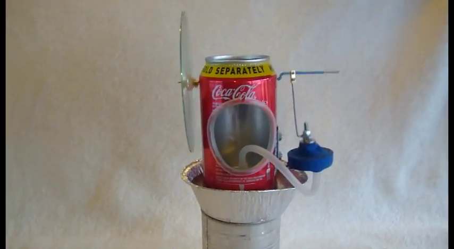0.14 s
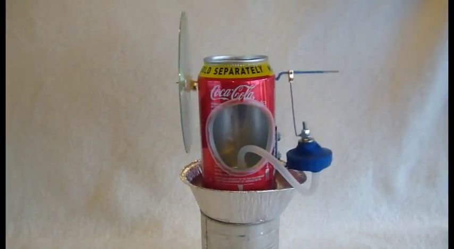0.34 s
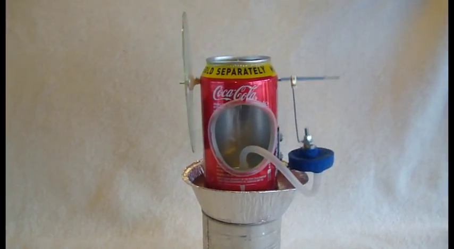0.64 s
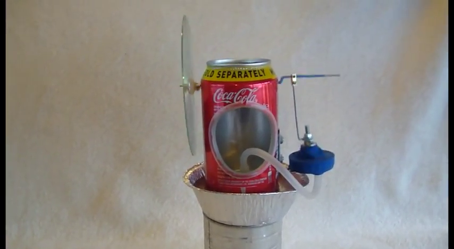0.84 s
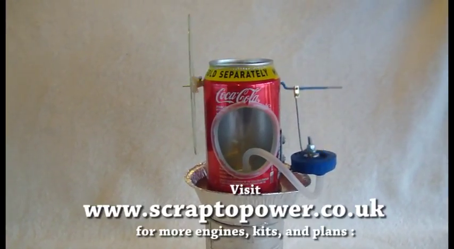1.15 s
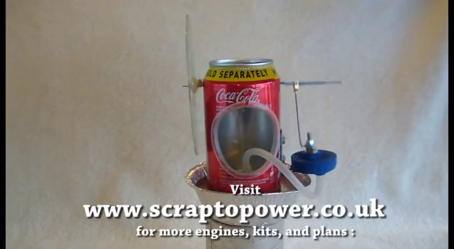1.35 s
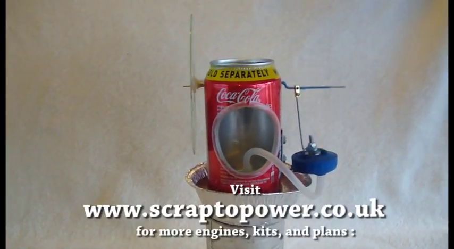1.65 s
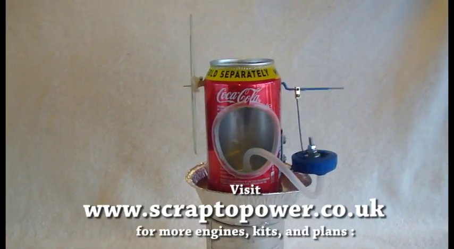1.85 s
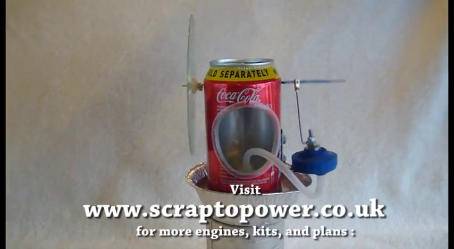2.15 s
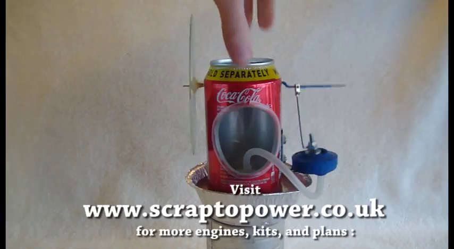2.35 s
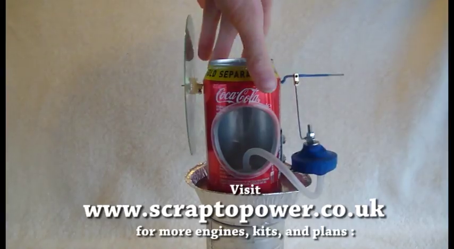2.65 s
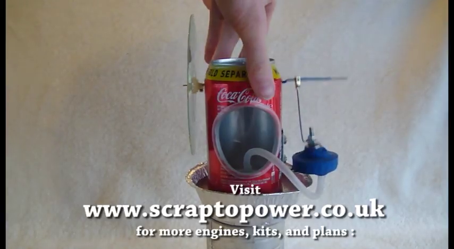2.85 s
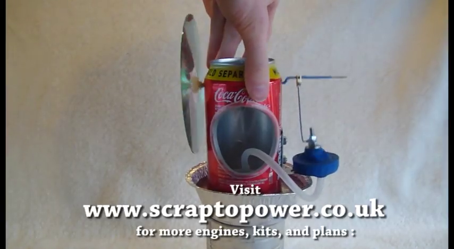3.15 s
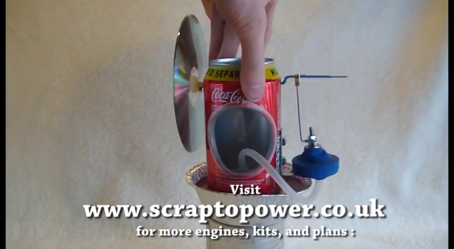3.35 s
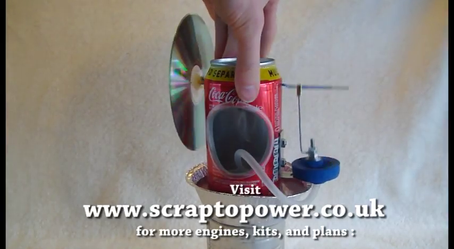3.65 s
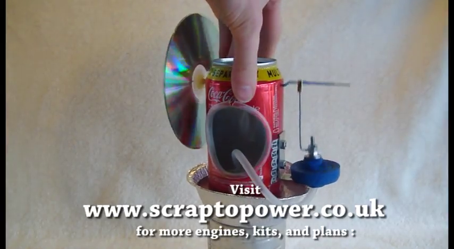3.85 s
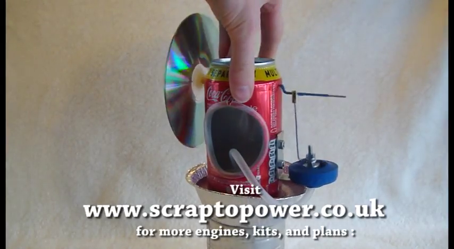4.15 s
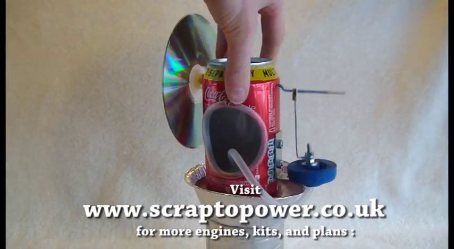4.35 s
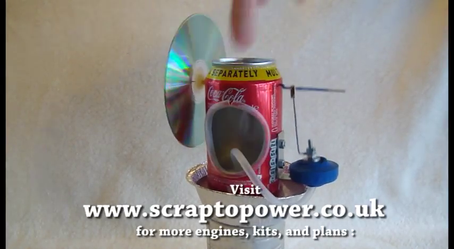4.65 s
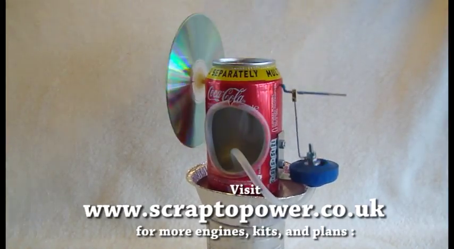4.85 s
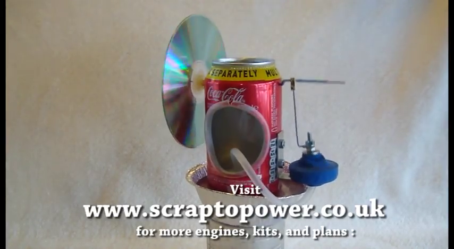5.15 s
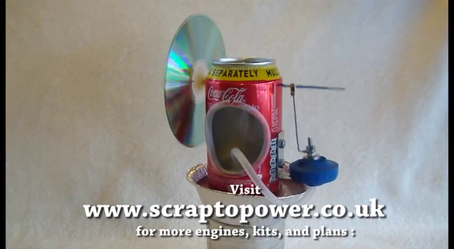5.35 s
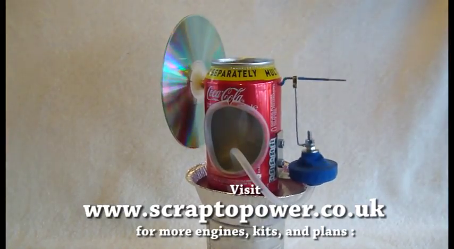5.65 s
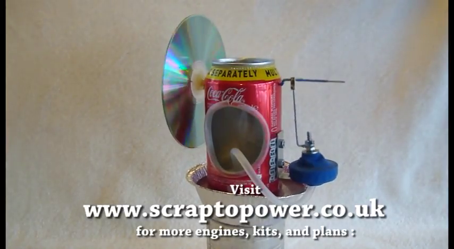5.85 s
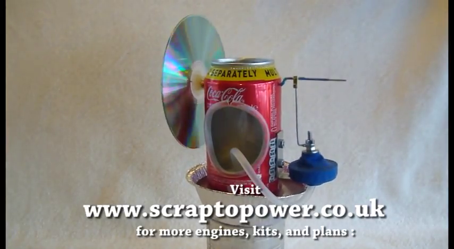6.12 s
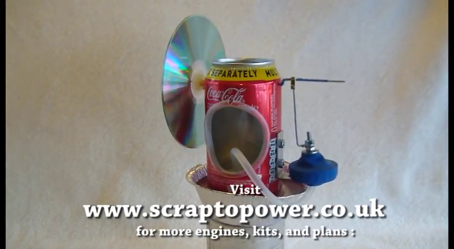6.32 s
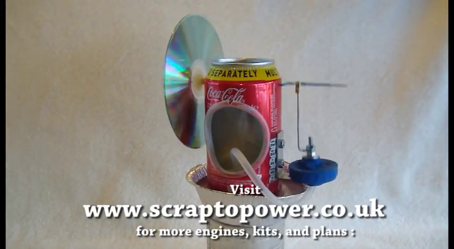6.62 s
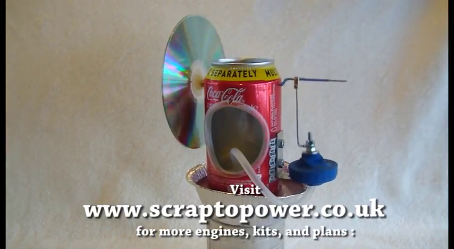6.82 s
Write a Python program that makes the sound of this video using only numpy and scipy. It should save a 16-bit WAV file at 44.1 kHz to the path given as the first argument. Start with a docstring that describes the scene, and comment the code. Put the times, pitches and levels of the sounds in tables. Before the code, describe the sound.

A small home-made engine built from a tin can clatters evenly throughout, about four turns a second. Each turn brings a sharp clack, light wire ticks, a knock from the loose crank and a soft scrape. The clatter grows gradually louder, with a faint hollow ring from the can in the middle, then holds steady. It is heard up close in a quiet room with a faint hiss.

```python
"""Tin-can hot-air engine

A small engine runs close by in a quiet room, about four turns a second, over a faint background hush.
In every turn the loose crank knocks, the wire linkage ticks and the sliding parts scrape; these forces
excite the resonant modes of one thin can, whose hollow also hums and booms. A clacking link and a
pinging rod ring in modes of their own."""
import sys
import numpy as np
from scipy import signal
from scipy.fft import rfft, irfft, next_fast_len
from scipy.io import wavfile
from scipy.ndimage import map_coordinates

SR = 44100
rng = np.random.default_rng(int(sys.argv[2]) if len(sys.argv) > 2 else 0)


def waveform_to_disk(signal):
    """Save audio, clipped to [-1, 1], as 16-bit WAV at the path in sys.argv[1]."""
    frames = np.transpose(np.atleast_2d(signal))
    scaled = np.clip(frames, -1, 1) * 32767
    samples = np.round(scaled).astype(np.int16)
    wavfile.write(sys.argv[1], SR, samples)


N = 307818

# Levels are relative. The can's modes form four families: low, mid, high and top.
HUSH_SPECTRUM = [(15, -23), (40, -19), (75, -1), (150, -5), (300, -27), (1000, -3.5), (3000, -14),
                 (6000, -30), (11000, -26)]  # background noise: f/Hz, level/dB
THUDS = [(0.095, -67), (2.13, -70)]  # dull far thuds: t/s, level/dB
ROOM_DECAY = [(300, 0.38), (2000, 0.042), (10000, 0.0079)]  # reverberation time: f/Hz, T60/s

# can modes: f/Hz, width/Hz, gain/dB when knocked (free, held, turned), gain/dB when ticked or scraped
CAN_MODES = [(342, 410, -3, -4.5, -6.5, -8), (618, 153, 4.5, -7, 0.5, 0.5), (737, 86, 3, 4, 7.5, -1),
             (879, 69, 1, 1, 1, 0.5), (1150, 243, -4, -14, -3.5, -8), (1342, 89, -15, -12, -11, 4),
             (1614, 144, -4.5, 8, 11, 9), (1798, 78, 5, 9, 8, 1.5), (1952, 69, 8.5, 9, 15, 13.5),
             (2017, 514, -6, -2, 4.5, 6), (3042, 128, -16, 2.5, 6.5, 3), (3204, 96, 5, 6.5, 12, 9),
             (3413, 604, -7, 0, 3, 4), (3893, 190, 7, 9, 12, 11.5), (4135, 468, 6.5, 6, 6, 4),
             (4830, 290, 0, -16, -19, -3), (5176, 106, 5, 2, -6.5, -1), (5616, 150, 4, 3, -0.5, -1.5),
             (6160, 250, -0.5, -15, -7, -3.5), (7390, 390, -5, -6.5, -6.5, -1.5),
             (8880, 950, -23, -15, -15.5, -8.5), (9380, 420, -9, -9, -12.5, -4.5),
             (10900, 840, -23, -14, -19.5, -11), (2012, 32, -1, -6, 12, 3.5)]
FAMILY_BORDERS = [1300, 2600, 4500]  # between the four families: f/Hz
STANCE_TIMES = [1.4, 3.5, 5.4]  # the can stands free, is held, has been turned: t/s
GRIP_GAINS = [-1, -4, -0.5, 0.5, -2]  # effect of the grip on each low mode: gain/dB
# modes of the rod, link, sliding guide and hollow: f/Hz, width/Hz, gain/dB
ROD_MODES = [(8640, 180, 6.5), (9400, 650, 15), (10300, 76, 10.5), (10800, 2500, 1)]
LINK_MODES = [(890, 36, -1), (1655, 480, -5), (2086, 216, 0), (2252, 180, -1.5), (4490, 290, -9),
              (6550, 260, -9)]
LINK_TOP_MODES = [(9500, 340, -13), (8150, 340, 7), (9770, 600, 15)]
GUIDE_MODES = [(3820, 540, 0), (5000, 730, -1.5), (5490, 530, -3)]
HOLLOW_MODES = [(766.5, 24, 3.5), (926, 33, -6.5), (947, 15, 8.5)]

# course of the run: t/s, shaking/dB, hollow note/dB, knock's top re mid/dB, extra scraping treble/dB
SHAKING = [(0, -60.5, -86, -1.5, -0.5), (1.7, -57.5, -61, -4.5, 1.5), (2.5, -56, -62, -2, 2),
           (3.3, -56, -49, -3.5, 3.5), (4.2, -56, -46, -5, 3.5), (4.9, -51.5, -56, 1, 0),
           (5.6, -52.5, -67, -1, 3), (6.98, -52, -70, 2, 0.5)]
# slides after each knock: start/turn, end/turn, then low, mid, high, top level re shaking/dB
SLIDES = [(0.038, 0.175, 2, -1, -0.5, -16), (0.221, 0.278, 5, 2, 3, -3.5),
          (0.305, 0.423, 2.5, 2.5, 0.5, -41), (0.478, 0.589, -5, -0.5, -2.5, -29),
          (0.583, 0.717, 6, 2.5, 4.5, 0.5), (0.73, 0.77, -1.5, 3, -9.5, -6),
          (0.787, 1.03, -3, -8, -11, -6.5)]
BOOMS = [(1.453, -49, -65), (2.005, -46.5, -66), (2.287, -54, -47), (2.368, -53, -54), (2.598, -45, -60),
         (2.709, -54, -51), (2.927, -44, -69), (3.068, -48, -50), (3.158, -42, -51), (3.288, -59, -46),
         (3.388, -41, -64), (3.526, -53, -62), (3.618, -55, -56), (3.76, -42.5, -67), (3.845, -43.5, -56),
         (3.986, -53, -58), (4.215, -52, -50), (4.299, -44.5, -70), (4.442, -40, -59), (4.664, -46, -46),
         (4.758, -40, -49), (4.81, -43.5, -42), (4.914, -51, -71), (4.985, -51, -47), (5.131, -43, -62),
         (5.222, -44, -56), (5.354, -51, -59), (5.45, -49, -63), (5.5, -43.5, -46), (5.689, -50, -63),
         (6.061, -47, -70), (6.198, -45, -48), (6.759, -46, -65)]  # booms of the hollow: t/s, lower note/dB, upper note/dB
PINGS = [(0.0797, -37), (0.3162, -46), (0.551, -42), (0.785, -58), (1.014, -41), (1.246, -41), (1.474, -43),
         (1.7052, -44), (1.934, -34), (2.164, -35), (2.394, -51), (2.6263, -52.5), (2.852, -36),
         (3.082, -30), (3.31, -26), (3.5396, -28), (3.771, -34.5), (3.9986, -31.5), (4.224, -29.5),
         (4.4557, -41), (4.6857, -30.5), (4.913, -29), (5.143, -35), (5.373, -39), (5.6061, -32.5),
         (5.8374, -34), (6.068, -31.5), (6.3023, -37), (6.531, -25.5), (6.761, -36)]  # impacts on the rod: t/s, level/dB
CLACKS = [(0.0898, -39.5, -6), (0.3244, -42, 4.5), (0.559, -40.5, 4.5), (0.792, -42, -2), (1.024, -40, 1),
          (1.2543, -38, 6), (1.4825, -37, 7), (1.713, -39, 6), (1.9414, -37, 2), (2.1737, -36, 3.5),
          (2.4027, -36, 2), (2.635, -36.5, -1), (2.8614, -34, 4.5), (3.091, -37.5, -2.5), (3.322, -34, -3),
          (3.551, -33.5, 1), (3.781, -32.5, 3), (4.0066, -35, 5.5), (4.2368, -31.5, 5), (4.463, -34.5, 5.5),
          (4.695, -34, -1), (4.922, -33.5, 2.5), (5.1528, -34, 2), (5.383, -35, 1), (5.616, -34.5, 1),
          (5.846, -33, 2), (6.0796, -34.5, 2.5), (6.312, -34.5, -0.5), (6.5409, -49, 3), (6.772, -34, 3)]  # impacts on the link: t/s, level/dB, gain of this turn's ticks/dB
# ticks around a clack: lag/s (first, last), level re shaking/dB (first, last), high, top re mid/dB
LINKAGE_TICKS = [(-.04, -0.14, 0.5, -2.5, 1, -33), (-.028, -0.019, 3.5, -0.5, 10.5, -9),
                 (0.09, 0.07, 10, 7.5, -12, -34), (0.06, 0.032, 6.5, -1.5, -2, -20),
                 (.108, .103, -5.5, -5.5, 8.5, -19), (.148, .144, -16, 7.5, 5, -1)]
LOOSE_TICKS = [(0.062, -49, 9, 2), (0.386, -47, 2, 1), (0.5402, -50.5, 5, 7), (0.853, -46, 5, 0),
               (2.063, -48, 0, 3), (2.2914, -45, -7, 0), (2.7509, -41.5, 0, -9), (2.837, -49, 8, 5),
               (3.0057, -45.5, 7, 0), (3.0158, -45, -12, -16), (3.2347, -45.5, 13.5, -3),
               (3.298, -46, -5, 10), (3.464, -40, 1, -8), (3.694, -52.5, 21.5, 8), (3.7594, -48, -1, 9.5),
               (3.9848, -40.5, -1, 3), (4.123, -44, -4, -1), (4.1916, -49, 14.5, 2.5), (4.21, -44, 11.5, 7),
               (4.4394, -41.5, 0.5, -4), (4.8097, -36.5, -17, -4), (5.0085, -47, 3, -9),
               (5.2375, -37, -2, -13), (5.9335, -42, -5, -10), (5.2939, -42, 4.5, -10),
               (5.4426, -34.5, 4.5, -2), (5.446, -39, 2, -2), (5.5017, -33, -2.5, -6), (5.734, -52, -4, 6),
               (5.966, -35.5, -4, -8), (5.991, -47, 4, -6), (5.516, -46, 3, -3), (5.529, -50.5, 10, 0),
               (2.767, -47, 4, -5), (2.821, -50, 7, 1), (6.1988, -36, 0, -1), (6.264, -46.5, 11.5, 0),
               (6.3943, -43, 0, -20), (6.427, -53, -6, -1), (6.752, -40, -2, 4), (6.889, -38.5, -15, -4)]  # occasional ticks: t/s, level/dB, high re mid/dB, top re mid/dB
TAPS = [(0.1124, -45), (0.129, -46.5), (0.3473, -43), (0.3637, -40.5), (0.5793, -42.5), (0.599, -41.5),
        (0.8147, -45), (0.8325, -39), (1.0465, -43.5), (1.0606, -42.5), (1.2749, -43.5), (1.292, -39),
        (1.5037, -42), (1.5203, -40), (1.7355, -40), (1.7492, -40), (1.9615, -44), (1.9801, -38),
        (2.1942, -42.5), (2.2094, -38), (2.4235, -42), (2.44, -41), (2.6544, -44), (2.6707, -35.5),
        (2.883, -44), (2.8986, -42), (3.1131, -49), (3.128, -37.5), (3.344, -51), (3.3573, -38.5),
        (3.5678, -66), (3.5873, -39), (3.8023, -49), (3.816, -38), (4.029, -50), (4.042, -37),
        (4.2557, -51), (4.2693, -37.5), (4.4847, -59), (4.496, -36), (4.7146, -36), (4.7278, -35.5),
        (4.9427, -51), (4.9575, -35.5), (5.1727, -40), (5.1896, -34.5), (5.4018, -37), (5.4193, -33),
        (5.6337, -37), (5.6513, -36.5), (5.8663, -43), (5.8835, -34.5), (6.0965, -39.5), (6.1151, -35),
        (6.332, -43.5), (6.345, -35.5), (6.5617, -50), (6.575, -34), (6.7897, -41), (6.806, -35.5)]  # two taps between clack and knock: t/s, level/dB
KNOCKS = [(0.155, -42.5, 5.5), (0.39, -41.5, 6), (0.6237, -43, 6), (0.8582, -46.5, 7), (1.088, -39, 1),
          (1.314, -40.5, 1.5), (1.546, -41, 7), (1.776, -40, 6), (2.0055, -39.5, 4.5), (2.2351, -39.5, 6.5),
          (2.466, -38, 7), (2.696, -36, 3.5), (2.9241, -34, 0), (3.1519, -36, 1.5), (3.3821, -35, 2.5),
          (3.6142, -33, -1.5), (3.8429, -36, 1), (4.0686, -32.5, -5.5), (4.2934, -34, 0),
          (4.5246, -33.5, 2), (4.754, -31, 0), (4.9827, -34.5, 4), (5.213, -35.5, 6), (5.449, -39, 4),
          (5.6748, -32.5, 3.5), (5.9075, -32.5, 1.5), (6.1397, -34, 3.5), (6.371, -34, 2),
          (6.6017, -34.5, 4.5), (6.83, -34.5, 2)]  # crank impacts: t/s, level/dB, high re mid/dB

SNAP_SCATTER_DB, COLOUR_SCATTER_DB = 1.5, 1.5  # spread of crispness and timbre between contacts


def amp(db):
    """Amplitude ratio of a level in dB."""
    return 10 ** (np.asarray(db) / 20)


def unit(x):
    """Normalisation to an rms of 1."""
    return x / np.sqrt(np.mean(np.abs(x) ** 2) + 1e-20)


def along(points, hz):
    """Interpolation of (f/Hz, value) points on a logarithmic frequency axis."""
    f, values = np.transpose(points)
    return np.interp(np.log(hz + 1), np.log(f + 1), values)


def curves(rows, at):
    """Linear interpolation of each column over the times in the first."""
    s, *columns = np.transpose(rows)
    return np.array([np.interp(at, s, column) for column in columns])


def wobble(rate):
    """Smooth random modulation: a spline through rate knots a second."""
    return map_coordinates(rng.standard_normal(int(N * rate / SR) + 4), [np.arange(N) * rate / SR])


def filtered(x, response):
    """Linear filtering: the spectrum is multiplied by a frequency response."""
    size = next_fast_len(N + SR // 2)
    return irfft(rfft(x, size) * response(np.fft.rfftfreq(size, 1 / SR)), size)[..., :N]


def ring(force, modes):
    """Modal superposition: damped resonators of alternating sign, at unit power gain for white noise."""
    def response(f):
        return unit(sum((-1) ** k * amp(db) * 1j * f * width / (centre ** 2 - f * f + 1j * f * width)
                        for k, (centre, width, db) in enumerate(modes)))
    return filtered(force, response)


def impacts(times, db, hold_s, t60, snap, rise_s=0.00042):
    """Contact forces: an impulsive snap in noisy chatter that holds, then decays exponentially."""
    t = np.arange(SR // 20) / SR
    envelope = (1 - np.exp(-t / rise_s)) * amp(-60 * np.maximum(t - hold_s, 0) / t60)
    bursts = envelope * rng.standard_normal((len(times), len(t)))
    bursts *= np.linalg.norm(envelope) / np.linalg.norm(bursts, axis=1, keepdims=True)  # equal energy
    bursts[:, round(rise_s * SR)] += snap * amp(SNAP_SCATTER_DB * rng.standard_normal(len(times)))
    samples = np.round(times * SR).astype(int)[:, None] + np.arange(len(t))
    return np.bincount(samples.ravel(), (amp(db)[:, None] * bursts).ravel(), N + SR)[:N]


def background_hush():
    """Spectrally shaped noise: soft hiss over a low rumble, growing slowly louder for five seconds."""
    noise = unit(filtered(rng.standard_normal(N), lambda hz: amp(along(HUSH_SPECTRUM, hz))))
    return amp(np.interp(np.arange(N) / SR, [0, 5], [-78, -72]) + 1.8 * wobble(8.2)) * noise


def thuds():
    """Soft impacts excite a single damped low resonance."""
    s, db = np.transpose(THUDS)
    return ring(impacts(s, db, hold_s=0.014, t60=0.043, snap=0.3, rise_s=0.0044), [(95, 35, 0)])


def reverberation(x):
    """Convolution with a time-varying room response in which high frequencies decay fastest."""
    step, out = SR // 10, np.zeros(N + SR)
    for start in range(0, N, step):
        hz, t, spectra = signal.stft(rng.standard_normal(SR // 4), SR, nperseg=256)
        decay = amp(-60 * t / along(ROOM_DECAY, hz)[:, None])
        tail = signal.istft(spectra * decay, SR, nperseg=256)[1]
        wet = signal.fftconvolve(x[start:start + step], tail / np.linalg.norm(tail))
        out[start + 300:][:len(wet)] += wet  # reflections arrive about 7 ms late
    return out[:N]


def radiation(hz):
    """A small source radiates little bass; cancellation cuts one narrow notch."""
    detuning = 4500 ** 2 - hz ** 2
    highpass = (1j * hz / (300 + 1j * hz)) ** 2
    return highpass * (detuning + 1j * hz * 190) / (detuning + 1j * hz * 450)


def hollow_booms(notes_hz=(755.8, 953), swell_s=0.0074):
    """Cavity resonance: two notes swell and die quickly, a little off pitch each time."""
    t, out = np.arange(SR // 10) / SR, np.zeros(N + SR)
    swell = t / swell_s * np.exp(1 - t / swell_s)
    for s, *db in BOOMS:
        hz = np.array(notes_hz) * (1 + 0.0071 * rng.standard_normal(2))
        notes = np.sin(2 * np.pi * (hz[:, None] * t + rng.random((2, 1))))
        out[round(s * SR):][:len(t)] += swell * (amp(db) @ notes)
    return out[:N]


def slide_levels(angle, edge_turns=0.024, settle_s=3.9):
    """Friction follows the crank angle: the level in dB on each mode family."""
    start, end, *db = np.transpose(SLIDES)

    def window(a):
        return (np.tanh((a - start[:, None]) / edge_turns) - np.tanh((a - end[:, None]) / edge_turns)) / 2
    sliding = amp(db) @ np.abs(window(angle) + window(angle + 1))
    early_db = 2.5 * np.exp(-np.arange(N) / SR / settle_s)  # at first the parts rub harder between slides
    between = amp([-17, -17, -16.5, -16])[:, None] * amp(early_db)
    return 20 * np.log10(between + sliding)


def scraping():
    """Sliding friction: gritty forces for the can, and the sound of the guide and the hollow."""
    t, knock_s = np.arange(N) / SR, np.transpose(KNOCKS)[0]
    turn_s = np.r_[knock_s[0] - 0.232, knock_s, knock_s[-1] + 0.23]
    angle = np.interp(t, turn_s, np.arange(len(turn_s))) % 1  # in turns
    shake_db, note_db, _, treble_db = curves(SHAKING, t)
    stroke_db = slide_levels(angle)
    level_db = stroke_db + [shake_db, shake_db, shake_db, shake_db + treble_db]
    slips = (rng.random(N) < 260 / SR) * amp(7.4 * rng.random(N))  # tiny slips shake all modes at once
    grit = signal.lfilter([1], [1, -np.exp(-1 / (0.0028 * SR))], slips)
    flicker = amp([0.87 * wobble(40), 0.39 * wobble(60), 2.0 * wobble(70), 5.8 * wobble(70)])
    rough = (1 + grit * [[0.2], [0.9], [1.4], [1.6]]) * flicker * rng.standard_normal((4, N))
    friction = amp(level_db) * [unit(row) for row in rough]
    opening = 0.67 * np.exp(-((angle - 0.57) / 0.032) ** 2)  # a short swish as the stroke opens
    swish = amp(shake_db + 5.5 + 2.9 * wobble(110)) * (0.18 * amp(stroke_db[2]) + opening)
    swish *= (1 + 0.42 * grit) * rng.standard_normal(N)
    hum = amp(note_db + 3.5 * (stroke_db[0] - stroke_db[0].max())) * rng.standard_normal(N)
    guide = sum(ring(amp(2.7 * wobble(11) - 7.5) * swish, modes)
                for modes in (GUIDE_MODES[:1], GUIDE_MODES[1:]))
    return friction, guide + ring(hum, HOLLOW_MODES)


def rod_pings():
    """Free vibration of a thin rod after brief impacts."""
    s, db = np.transpose(PINGS)
    return ring(impacts(s, db, hold_s=0.00015, t60=0.014, snap=1.8), ROD_MODES)


def link_clacks():
    """Impacts excite the link's body modes and, more weakly, its top modes."""
    s, db, _ = np.transpose(CLACKS)
    top_db = db - 8 + COLOUR_SCATTER_DB * rng.standard_normal(len(s))
    body = ring(impacts(s, db, hold_s=0.00025, t60=0.024, snap=4.4), LINK_MODES)
    return body + ring(impacts(s, top_db, hold_s=0.00026, t60=0.018, snap=2.2), LINK_TOP_MODES)


def can_contacts(events, hold_s, t60, snap, low_db, low_hold_s, rise_s):
    """Impact forces on the four mode families; the can's belly shakes longer."""
    s, db, high_db, top_db = np.transpose(events)
    return np.array([impacts(s, db + high_db / 2 + low_db, low_hold_s, t60=0.029, snap=8.3),
                     impacts(s, db, hold_s, t60, snap, rise_s),
                     impacts(s, db + high_db, hold_s, t60, snap, rise_s),
                     impacts(s, db + top_db, hold_s, t60, snap, 2 * rise_s)])


def linkage_ticks(scatter_s=0.0003, scatter_db=2):
    """Light impact forces: loose ticks, and regular ones whose lag and level drift as the engine warms."""
    clack_s, _, turn_db = np.transpose(CLACKS)[..., None]
    first_s, last_s, first_db, last_db, high_db, top_db = np.transpose(LINKAGE_TICKS)
    progress = clack_s * SR / N
    s = clack_s + first_s + progress * (last_s - first_s)
    db = curves(SHAKING, clack_s)[0] + turn_db + first_db + progress * (last_db - first_db)
    regular = np.stack(np.broadcast_arrays(s, db, high_db, top_db), axis=-1).reshape(s.size, -1)
    scatter = [scatter_s, -scatter_db, COLOUR_SCATTER_DB, COLOUR_SCATTER_DB]
    regular += scatter * rng.standard_normal(regular.shape)
    return can_contacts(np.concatenate([LOOSE_TICKS, regular]), hold_s=0.00015, t60=0.024, snap=2.4,
                        low_db=-8.5, low_hold_s=0.0045, rise_s=0.00022)


def taps(high_db=-1.5, top_db=-3):
    """Very short contacts give broadband forces, each with a colour of its own."""
    colour_db = [high_db, top_db] + COLOUR_SCATTER_DB * rng.standard_normal((len(TAPS), 2))
    return can_contacts(np.column_stack([TAPS, colour_db]), hold_s=0.000092, t60=0.021, snap=4.54,
                        low_db=-9, low_hold_s=0.0049, rise_s=0.0002)


def crank_knocks():
    """Backlash: the loose crank strikes once a turn with a longer, chattering force."""
    s = np.transpose(KNOCKS)[0]
    top_db = curves(SHAKING, s)[2] + COLOUR_SCATTER_DB * rng.standard_normal(len(s))
    return can_contacts(np.column_stack([KNOCKS, top_db]), hold_s=0.0028, t60=0.032, snap=4.7,
                        low_db=-14, low_hold_s=0.018, rise_s=0.0009)


def can(forces, column):
    """Forced vibration: each force drives one mode family, with the gains in one table column."""
    modes = np.array(CAN_MODES)[:, [0, 1, column]]
    family = np.searchsorted(FAMILY_BORDERS, modes[:, 0])
    return sum(ring(force, modes[family == k]) for k, force in enumerate(forces))


def rubbed_can(forces):
    """Modal response to ticks, taps and friction; the grip weakens the lowest modes."""
    held = np.interp(np.arange(N) / SR, STANCE_TIMES, [0, 1, 0.55])
    held_modes = [(hz, width, db + grip_db) for (hz, width, *_, db), grip_db in zip(CAN_MODES, GRIP_GAINS)]
    free_forces = np.vstack([(1 - held) * forces[0], forces[1:]])
    return ring(held * forces[0], held_modes) + can(free_forces, column=5)


def knocked_can(forces):
    """Modal response to knocks; the modal gains shift as the can is gripped and turned."""
    t = np.arange(N) / SR
    return sum(can(forces * np.interp(t, STANCE_TIMES, share), column=2 + k)
               for k, share in enumerate(np.eye(len(STANCE_TIMES))))


def scene():
    """Superposition of the engine's direct sound, its reverberation and the background."""
    friction, swish_and_hum = scraping()
    light_forces = linkage_ticks() + taps() + friction
    vibration = knocked_can(crank_knocks()) + rubbed_can(light_forces)
    vibration += rod_pings() + link_clacks() + hollow_booms() + swish_and_hum
    direct = filtered(vibration, radiation)
    return (direct + amp(-15) * reverberation(direct) + background_hush() + thuds())[None]


def record(dry, sampling_hz=24000, top_hz=16000):
    """Spectral imaging: a steep edge below half of sampling_hz, and a faint mirrored treble above."""
    def image_gain(hz):
        return amp(np.interp(hz, [12600, 13080, 13940, 14700, 15500, 15900],
                             [-66, -5.5, -14, -23, -33, -55]))
    band = filtered(dry, lambda hz: amp(np.interp(hz, [10800, 11300, 12200], [0, -22, -48])))
    image = band * np.cos(2 * np.pi * sampling_hz * np.arange(N) / SR)
    return filtered(band + filtered(image, image_gain), lambda hz: hz < top_hz)


dry = scene()
out = record(dry)
waveform_to_disk(out)
```